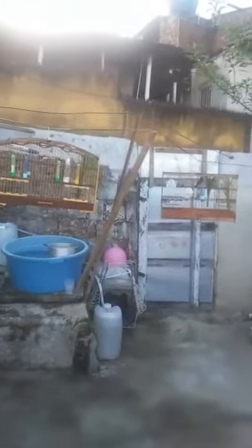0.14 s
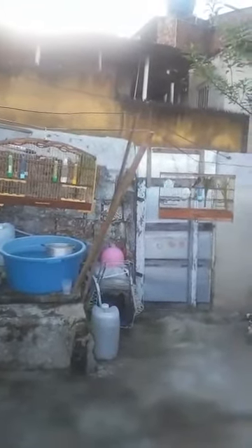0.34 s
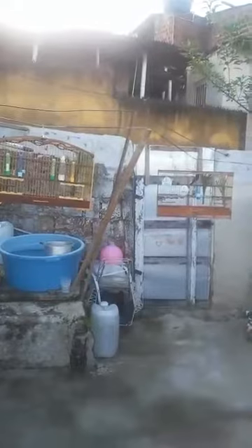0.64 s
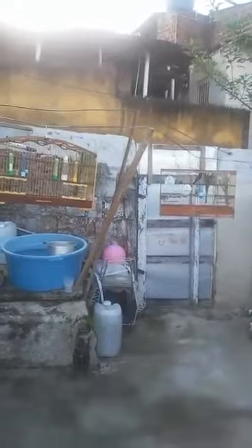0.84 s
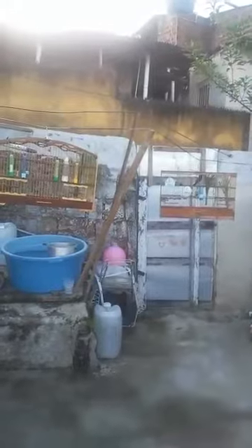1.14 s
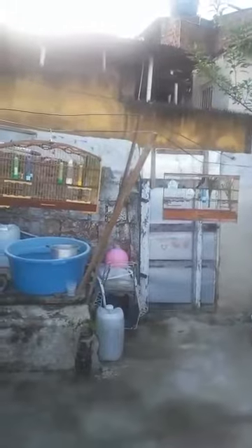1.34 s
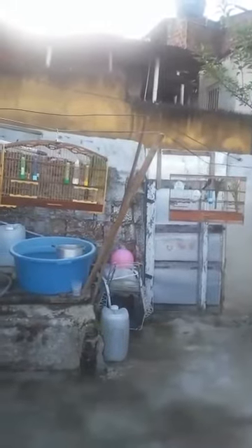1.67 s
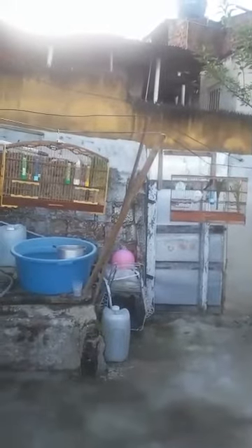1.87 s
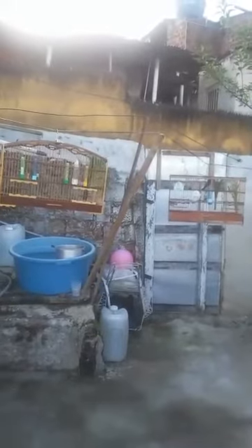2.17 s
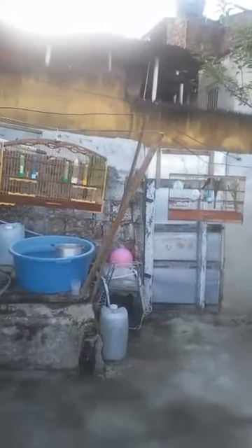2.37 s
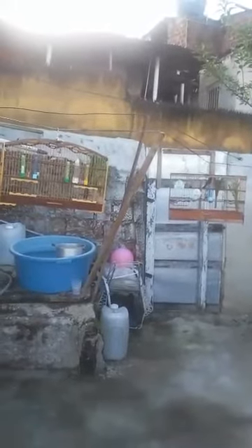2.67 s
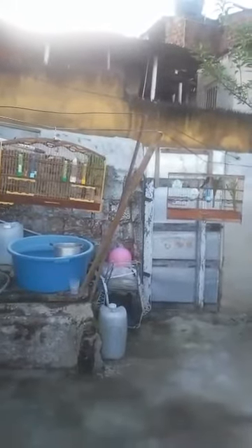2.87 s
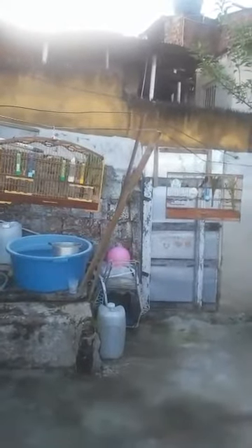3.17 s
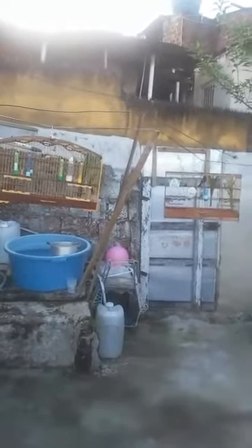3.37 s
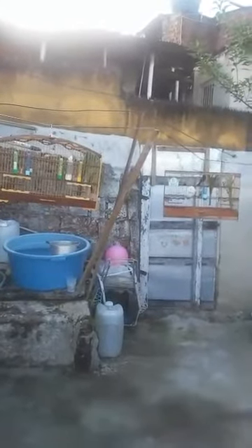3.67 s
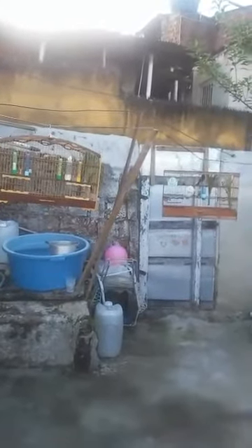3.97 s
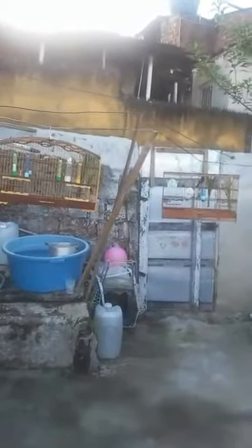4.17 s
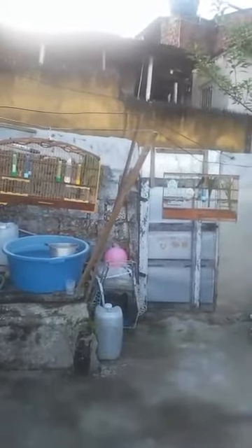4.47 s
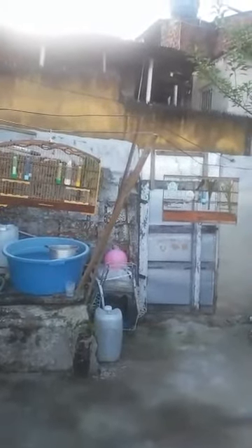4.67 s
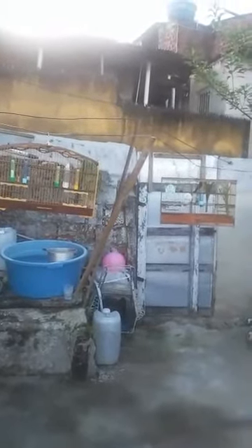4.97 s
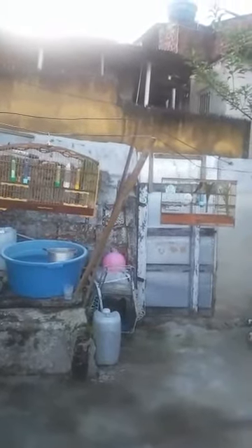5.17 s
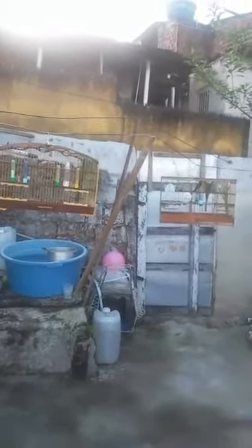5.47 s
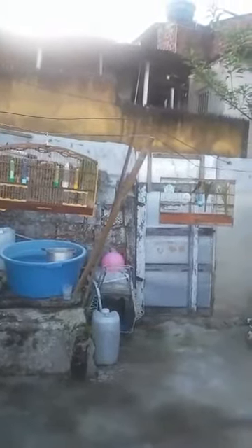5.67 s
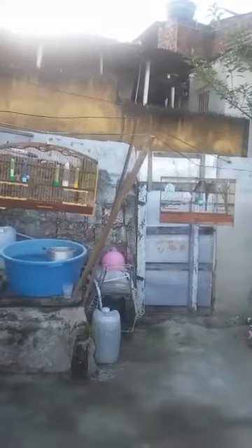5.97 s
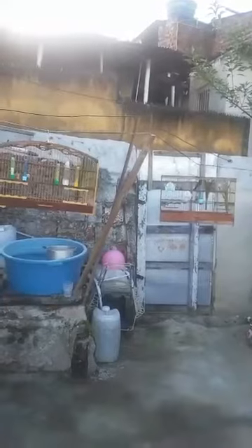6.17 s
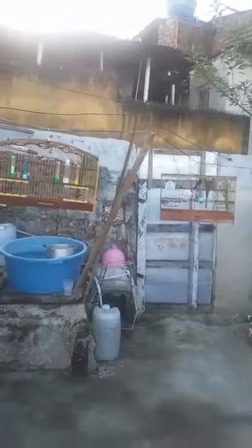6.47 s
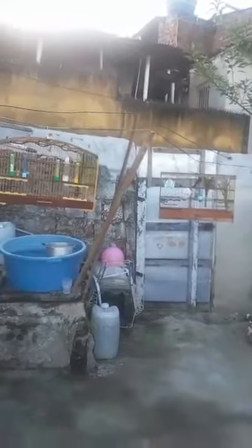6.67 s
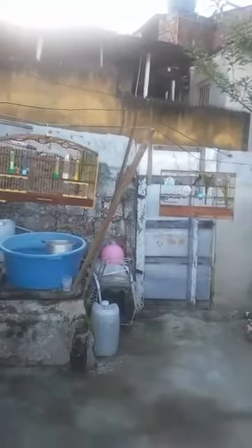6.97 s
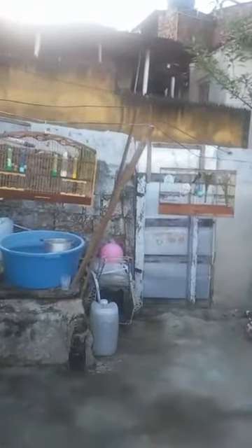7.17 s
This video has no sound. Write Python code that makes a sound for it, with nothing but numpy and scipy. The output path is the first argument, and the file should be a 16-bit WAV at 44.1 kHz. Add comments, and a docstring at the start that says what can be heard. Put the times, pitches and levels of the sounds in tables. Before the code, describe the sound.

A quiet walled backyard, heard from one microphone, with faint traffic, far birds and a low rumble and hum. A broom sweeps softly about twice a second through most of it. Small caged birds chirp and warble lightly from the start, and there is a small tap at 0.6 seconds. From 1.3 to 2.3 seconds a close bird whistles four rising notes, each louder, then one falling note; this is the loudest sound, with a short echo off the walls. A dog barks once in the street at about 2.1 seconds. Around 3.5 to 4 seconds come lighter chirps, a quick twitter and a dull yip. From about 5.1 to 6.9 seconds two roosters crow further off, overlapping, one hoarse, one clear with a long falling last note. The dog barks three more times between 6.4 and 7.3 seconds.

```python
"""Caged seedeater in a walled yard

Close to one phone microphone, a seedeater whistles four rising notes and a falling one, echoed by the
walls; further cages chip and warble. A broom sweeps in even strokes. Out in the street a dog barks and
two roosters crow, one clear, one hoarse, over far birds, traffic, low rumble and mains hum.
The phone's noise suppressor darkens whatever is faint."""
import sys
import numpy as np
from scipy import signal
from scipy.fft import rfft, irfft, next_fast_len
from scipy.io import wavfile
from scipy.ndimage import uniform_filter1d

SR = 44100
rng = np.random.default_rng(int(sys.argv[2]) if len(sys.argv) > 2 else 0)


def persist_wave(psi):
    """Save psi, clipped to +-1, as 16-bit WAV."""
    counts = np.round(np.clip(psi, -1, 1) * 32767).astype(np.int16)
    wavfile.write(sys.argv[1], SR, np.atleast_2d(counts).T)


N = 322799
T = np.arange(N) / SR

# seedeater, close: start t/s, loudest t/s, end t/s, start f/Hz, end f/Hz, peak level/dB,
# end level/dB, octave level/dB
RISING_WHISTLES = [(1.252, 1.424, 1.445, 2330, 3953, -24, -37, -86),
                   (1.512, 1.615, 1.69, 2484, 4789, -19.5, -24.5, -64),
                   (1.719, 1.817, 1.89, 2513, 4838, -16.5, -25, -59.5),
                   (1.923, 2.017, 2.075, 2613, 4750, -13.5, -24, -60.5)]
# their glide (scoop, linger, climb, flat top): share of the length, share of the rise
WHISTLE_GLIDE = [(0, 0), (.05, .1), (.2, .17), (.35, .32), (.6, .68), (.8, .92), (.9, 0.97), (1, 1)]

CAGE_WARBLES = [
    [(.895, 4350, -56), (.92, 4010, -53), (.94, 4020, -48.5)],
    [(.955, 4260, -62), (.975, 3580, -48.5), (1.0, 3507, -46.5), (1.035, 3480, -66)],
    [(3.655, 3060, -46), (3.667, 4150, -42.5), (3.68, 3970, -38.5), (3.692, 3435, -35.5),
     (3.698, 2715, -45)],
    [(3.93, 1833, -70), (3.96, 2030, -51), (4.005, 2250, -52.5), (4.04, 1670, -56)],
]  # further cages, one list a note: t/s, f/Hz, level/dB
CAGE_CHIPS = [(0.308, 2950, -56), (0.642, 3740, -52), (.8, 2900, -53.5), (0.913, 4063, -53),
              (1.178, 4123, -53), (1.443, 3105, -53.5), (3.887, 2900, -53), (4.093, 3900, -53.5),
              (4.226, 2900, -63), (4.365, 3458, -59), (4.615, 3365, -56), (4.868, 3240, -58.5)]  # one bird's chips: t/s, start f/Hz, level/dB
CAGE_TWITTERS = [(0.111, .022, 4780, -57), (.169, 0.038, 5100, -55), (1.112, 0.035, 5140, -56.5),
                 (2.902, 0.0342, 6850, -59.5), (3.643, 0.0044, 3960, -41.5), (3.758, .014, 3040, -47),
                 (3.806, 0.018, 3070, -46.5), (3.85, .018, 3030, -47.5), (3.896, 0.015, 3050, -51.5),
                 (3.916, 0.0097, 3000, -55)]  # thin twitters: t/s, length/s, start f/Hz, level/dB

BROOM_STROKES = [(.22, 0.11, -58.5), (.658, 0.081, -59), (1.13, 0.14, -61.5), (1.558, 0.099, -60),
                 (2.52, 0.13, -60.5), (3.04, .09, -57.5), (3.53, 0.097, -60), (4.08, 0.093, -58),
                 (4.54, 0.108, -65), (4.94, 0.0672, -67.5), (5.35, 0.172, -73.5), (5.751, 0.232, -69),
                 (6.3, 0.1195, -64.5), (6.88, 0.14, -58), (7.279, 0.0836, -65)]  # sweeps in the yard: peak t/s, swell/s, level/dB
BRISTLE_SPECTRUM = [(900, -42.5), (2000, -9), (3200, -4), (4500, 1.5), (6000, -3), (7000, -8),
                    (7600, -20.5), (9300, -22.5), (10500, -50.5)]  # bristle hiss: f/Hz, level/dB
TAP_AND_CLICK = [(0.554, 1420, 0.036, -40.5), (1.611, 7540, 0.00117, -39.5)]  # a small tap, then a digital click: t/s, ring f/Hz, t60/s, peak level/dB

# dog in the street, a high voice breaking into a low one: start t/s, break t/s, end t/s,
# high f/Hz, low f/Hz, high level/dB, low level/dB, high and low tilt/(dB per octave)
DOG_BARKS = [(2.095, 2.195, 2.31, 595, 483.6, -34.5, -35, -2, 12),
             (6.433, 6.502, 6.62, 676.6, 469.4, -36, -31.5, 0, 9),
             (6.8, 6.906, 7.0, 561.3, 441, -36, -35.5, -3.5, 3.5),
             (7.086, 7.154, 7.3, 541.3, 479, -38, -36, -10, -2)]
DOG_YIPS = [(3.712, .16, 569.6, -46.5, -11), (6.692, .08, 583, -39, -14)]  # dull half barks: t/s, length/s, f/Hz, peak level/dB, tilt/(dB per octave)
DOG_FORMANTS = [(550, 390, -19), (941, 226, -2), (1613.5, 160, -8.5), (2400, 230, -33.5)]  # throat resonances: f/Hz, width/Hz, gain/dB
BREATH_SPECTRUM = [(350, -42), (500, -4.5), (1000, 4), (1700, -4.5), (2600, -12.5), (3500, -33.5),
                   (6000, -76)]  # the dog's breath: f/Hz, level/dB

# clear rooster, further off: t/s, length/s, f/Hz, peak level/dB, tilt/(dB per octave)
CROW_SYLLABLES = [(5.353, 0.098, 680, -40, 5), (5.439, 0.089, 700, -44, 0.5), (5.503, .13, 739.6, -51, 1),
                  (5.709, .1, 720, -38, -2), (5.931, 0.17, 718.7, -41, -3), (6.2, .11, 720, -40.5, -0.5)]
CROW_LAST_NOTE = [(6.31, 706, -55.5), (6.419, 670, -46), (6.521, 700, -45.5), (6.7, 692, -44),
                  (6.801, 659.2, -46), (6.869, 627, -44)]  # its long last note: t/s, f/Hz, level/dB
CROW_FORMANTS = [(720, 56, 2), (1420, 250, 6), (2900, 160, -29)]  # its throat: f/Hz, width/Hz, gain/dB
HOARSE_CROW = [(5.11, 601.1, -58), (5.159, 630, -53), (5.302, 575, -48), (5.4, 582.4, -47.5),
               (5.58, 595.2, -55.5), (5.7, 590, -43), (5.8, 586.6, -49), (5.9, 591.7, -42),
               (6.1, 607.7, -44), (6.45, 580.4, -52), (6.601, 567, -69.5)]  # hoarse rooster behind it: t/s, f/Hz, level/dB
HOARSE_FORMANTS = [(620, 340, 1), (1290, 560, 3.5), (1660.4, 270, 3)]  # its throat: f/Hz, width/Hz, gain/dB

# far calls and the roosters' upper overtones: t/s, length/s, f/Hz, spread/Hz, level/dB
BLURRED_TONES = [ (0, 0.35, 1430, 37.7, -59.5), (0.344, 0.34, 1023, 30.3, -61),
                 (.556, 0.1926, 1347, 30.2, -60), (1.406, 0.24, 1229, 39.7, -61),
                 (2.498, .34, 2415, 150, -73), (2.587, 0.1648, 4924, 200.5, -71.5),
                 (3.007, 0.1, 1949, 89.8, -67), (3.002, 0.369, 3795, 433, -68.5),
                 (3.604, 0.33, 1086, 39.4, -57), (3.653, 0.16, 1620, 39.5, -64),
                 (3.902, 0.073, 6470, 160, -67), (4.242, 0.23, 1580, 50.16, -72.5),
                 (4.462, 0.19, 4741, 300, -71.5), (4.5, 0.078, 1890, 60, -64.5),
                 (5.173, 0.334, 4436, 90, -75), (5.3, 0.177, 1635, 120, -51.5),
                 (5.3, .2, 4916, 153.2, -70.5), (5.522, .61, 2684, 122, -63), (5.571, .12, 3130, 250, -68),
                 (5.617, .17, 5400, 151.3, -72.5), (5.886, .1, 3027, 320, -53.5),
                 (5.893, 0.09, 5610, 110, -69.5), (5.893, .38, 2477, 159.4, -60.5),
                 (6.02, .39, 2970, 140.4, -56.5), (6.446, 0.2026, 4421, 486, -61.5),
                 (6.515, 0.16, 5180, 515, -61.5), (6.995, 0.12, 4270, 157.5, -65),
                 (7.2, .12, 5020, 251, -69), (7.225, 0.061, 2816, 79.6, -54.5)]
DISTANT_WHISTLE = [(3.327, 2400, -59.5), (3.462, 3970, -53.5), (3.5, 3916, -55.5), (3.609, 3966, -51)]  # one far rising whistle: t/s, f/Hz, level/dB
CHATTER_BOUTS = [(0.311, 0.74, 2810, -63.5), (1.251, 0.83, 2792, -62.5), (2.15, 0.23, 3231, -66.5),
                 (3.047, 0.983, 3055, -67), (4.345, 0.317, 2754, -70.5), (6.781, 0.42, 3075, -64)]  # far birds: t/s, length/s, centre f/Hz, level/dB
TRAFFIC_SPECTRUM = [(200, -39.5), (350, -9.5), (480, -0.5), (900, 0.5), (1220, -3), (1400, -10),
                    (2200, -20), (3500, -27.5), (6000, -35.5), (9000, -50)]  # wash from beyond the walls: f/Hz, level/dB
TRAFFIC_LEVELS = [(0, -54.5), (.7, -59), (2, -60.5), (2.7, -58.5), (3.4, -61), (4.5, -56), (4.8, -64),
                  (5.1, -60.5), (6.3, -59.5), (6.6, -56.5), (7.32, -53.5)]  # its slow swell: t/s, level/dB
RUMBLE_SPECTRUM = [(60, -41.5), (110, -25.5), (160, -23.5), (210, -3.5), (270, -1), (380, 1.5), (480, -28)]  # low rumble: f/Hz, level/dB
RUMBLE_HUM_LEVELS = [(0, -69.5, -85), (1.3, -68.5, -80), (3.5, -68.5, -84.5), (5.0, -76, -86.5),
                     (6.3, -78, -90), (7.32, -90, -87.5)]  # rumble and hum: t/s, rumble level/dB, mains level/dB
MAINS_LINES = [(120, -5), (360, 8.5)]  # hum partials: f/Hz, gain/dB

WALL_ECHOES = [(3, -5), (6, -15.5), (10, -8.5), (15, -8.5)]  # nearest walls: delay/ms, level/dB
# diffuse tails at the microphone: t60/s, level/dB against the direct sound
YARD_TAILS = [(.15, 0.5), (0.501, -15.5)]  # quick flutter, then a long tail
PORCH_TAILS = [(0.351, -1.8)]  # further cages, mostly direct
STREET_TAILS = [(0.201, -3), (0.901, -2)]  # more tail than direct sound
ROOF_TAILS = [(.5, -8)]  # in the open, little echo


def seedeater(swell_db_per_s=260, octave_change_db=9, sink_s=.058):
    """Close to the microphone: near-sine whistles with a faint, breathy octave."""
    out, progress, notes = np.zeros(N), np.linspace(0, 1, 25), []
    glide = np.interp(progress, *np.transpose(WHISTLE_GLIDE))
    for start, loudest, end, start_hz, end_hz, peak_db, end_db, octave_db in RISING_WHISTLES:
        t = start + progress * (end - start)
        hz = start_hz + (end_hz - start_hz) * glide
        onset_db = peak_db - swell_db_per_s * (loudest - start)
        db = np.interp(t, [start, loudest, end], [onset_db, peak_db, end_db])
        notes.append((t, hz, db, octave_db - octave_change_db * progress))
    # the closing whistle sinks towards a floor while its octave grows
    start, full, end, start_hz, floor_hz = 2.118, 2.178, 2.278, 8870, 5618
    t = start + progress * (end - start)
    hz = floor_hz + (start_hz - floor_hz) * np.exp(-(t - start) / sink_s)
    db = np.interp(t, [start, full, end - .019, end], [-62.5, -23, -23, -33.5])
    notes.append((t, hz, db, -76.5 + octave_change_db * progress))
    for t, hz, db, octave_db in notes:
        sing(out, np.transpose([t, hz, db]), pure, rough=.2, rasp_hz=250, edge_s=.006)
        sing(out, np.transpose([t, 2 * hz, octave_db]), pure, rough=1, rasp_hz=1500, edge_s=.0062)
    return out


def cage_birds(chip_s=.026, chip_end_hz=2400, twitter_drop_per_s=5.3):
    """Further cages on the porch: warbles, and chips and twitters that drop fast, then level out."""
    out = np.zeros(N)
    for note in CAGE_WARBLES:
        sing(out, note, pure, rough=.13)
    drops = [(t, chip_s, hz, chip_end_hz, db) for t, hz, db in CAGE_CHIPS]
    for t, length, hz, db in CAGE_TWITTERS:
        drops.append((t, length, hz, hz * (1 - twitter_drop_per_s * length), db))
    for t, length, start_hz, end_hz, db in drops:
        mid_hz = end_hz + .26 * (start_hz - end_hz)
        note = [(t, start_hz, db), (t + length / 2, mid_hz, db), (t + length, end_hz, db)]
        sing(out, note, pure, rough=.35, rasp_hz=700, edge_s=.00067)
    return out


def broom(fall_ratio=1.07):
    """Across the yard: scratchy bristle hiss, each stroke swelling smoothly and trailing away."""
    strokes = 0
    for peak, swell_s, db in BROOM_STROKES:
        rise = np.exp(-((T - peak) / swell_s) ** 2)
        fall = 1 / np.cosh(np.clip((T - peak) / (fall_ratio * swell_s), 0, 50)) ** 2
        strokes += undb(db) * np.where(T < peak, rise, fall)
    scratches = undb(2 * wander(120))
    return strokes * scratches * coloured_noise(BRISTLE_SPECTRUM)


def tap_and_click():
    """A small tap and a thin, dry digital click, each a damped sine."""
    out, t = np.zeros(N), np.arange(2000) / SR
    for start, hz, t60, db in TAP_AND_CLICK:
        i = int(start * SR)
        out[i:i + len(t)] += undb(db - 60 * t / t60) * np.sin(2 * np.pi * hz * t)
    return out


def dog(attack_s=.0461, break_s=.008, release_s=.0481, breath_db=-6.5):
    """In the street: rough voiced barks and yips; breath noise follows their level and brightness."""
    voice, breath, effort, calls = np.zeros(N), coloured_noise(BREATH_SPECTRUM), 0, []
    for start, turn, end, high_hz, low_hz, high_db, low_db, high_tilt, low_tilt in DOG_BARKS:
        calls.append([(start, .92 * high_hz, high_db - 12.5, -20),  # scoops up into the high, dull voice
                      (start + attack_s, high_hz, high_db, high_tilt),
                      (turn, high_hz, high_db, high_tilt),
                      (turn + break_s, 1.07 * low_hz, low_db, low_tilt),  # breaks lower and brighter
                      (end - release_s, low_hz, low_db, low_tilt),
                      (end, low_hz, low_db - 12, low_tilt)])
    for t, length, hz, db, tilt in DOG_YIPS:
        calls.append([(t, hz, db - 12.5, tilt),
                      (t + length / 3, hz, db, tilt),
                      (t + length, .9 * hz, db - 17.5, tilt)])
    for call in calls:
        sing(voice, call, throat(DOG_FORMANTS), rough=.45, rasp_hz=240)
        t, _, db, tilt = np.transpose(call)
        effort += undb(np.interp(T, t, db + np.minimum(tilt, 0) / 2, left=-200, right=-200))
    breath *= undb(breath_db) * uniform_filter1d(effort, size=300)
    return low_cut(voice + breath, hz=431)


def clear_rooster(edge_pitch_ratio=.97, last_tilt_db=18.5):
    """Further off, in the open: short arched syllables, then a long, bright, falling note."""
    out, notes = np.zeros(N), []
    for t, length, hz, db, tilt in CROW_SYLLABLES:
        notes.append([(t, edge_pitch_ratio * hz, db - 2.5, tilt),
                      (t + .4 * length, hz, db, tilt),
                      (t + length, edge_pitch_ratio * hz, db - 6, tilt)])
    notes.append([(*row, last_tilt_db) for row in CROW_LAST_NOTE])
    for note in notes:
        sing(out, note, throat(CROW_FORMANTS), rough=.17, rasp_hz=70, edge_s=.0027)
    return out


def hoarse_rooster(waver_share=.012):
    """Behind the clear one: a rasping crow whose pitch wavers."""
    out = np.zeros(N)
    times, hz, db = np.transpose(HOARSE_CROW)
    t = np.arange(times[0], times[-1], .01)
    waver = 1 + waver_share * wander(9)[(t * SR).astype(int)]
    note = np.transpose([t, waver * np.interp(t, times, hz), np.interp(t, times, db)])
    sing(out, note, throat(HOARSE_FORMANTS), rough=.8, rasp_hz=450)
    return low_cut(out, hz=523)


def blurred_tones(sag_ratio=.97):
    """Faint blurred tones: far calls, the roosters' upper overtones and one rising whistle."""
    out = np.zeros(N)
    for t, length, hz, spread_hz, db in BLURRED_TONES:
        note = [(t, hz, db), (t + length, sag_ratio * hz, db)]
        sing(out, note, pure, rough=spread_hz / 50, rasp_hz=2 * spread_hz, edge_s=.024)
    sing(out, DISTANT_WHISTLE, pure, rough=.98, rasp_hz=1000, edge_s=.017)
    return out


def traffic():
    """Beyond the walls: a wash of noise that slowly swells and ebbs."""
    level_db = np.interp(T, *np.transpose(TRAFFIC_LEVELS))
    return coloured_noise(TRAFFIC_SPECTRUM) * undb(level_db + .8 * wander(6))


def distant_chatter():
    """Birds so far off that each bout blurs into a band of noise."""
    out = np.zeros(N)
    for t, length, hz, db in CHATTER_BOUTS:
        sing(out, [(t, hz, db), (t + length, hz, db)], pure, rough=.955, rasp_hz=1400, edge_s=.049)
    return out


def rumble():
    """Low rumble; its set fade stands for the phone's noise suppressor gradually turning it down."""
    t, db, _ = np.transpose(RUMBLE_HUM_LEVELS)
    return coloured_noise(RUMBLE_SPECTRUM) * undb(np.interp(T, t, db))


def mains_hum():
    """Under everything: mains lines that waver a little in level."""
    t, _, level_db = np.transpose(RUMBLE_HUM_LEVELS)
    lines = sum(undb(db + 2.4 * wander(22)) * np.sin(2 * np.pi * hz * T) for hz, db in MAINS_LINES)
    return np.sqrt(2) * lines * undb(np.interp(T, t, level_db))


def sing(out, rows, overtones, rough, rasp_hz=60, edge_s=.004):
    """Adds a note of rows (t/s, f/Hz, level/dB, optional tilt); rough trades tone for rasp."""
    times, hz, db, *tilt = np.transpose(rows)
    i = np.arange(max(int(times[0] * SR), 0), min(int(times[-1] * SR), N))
    t = i / SR
    pitch = uniform_filter1d(np.interp(t, times, hz), int(.003 * SR), mode="nearest")
    phase = 2 * np.pi * np.cumsum(pitch) / SR
    tilt_db = np.interp(t, times, tilt[0]) if tilt else 0
    rasp_share, note, power = np.clip(rough, 0, 1), 0, 0
    for k in range(1, 8):
        gain = overtones(k, k * pitch) * undb(tilt_db * np.log2(k))
        if k * pitch.max() < .45 * SR and np.max(gain) > 0:
            rasp = (wander(rasp_hz, len(i)) + 1j * wander(rasp_hz, len(i))) / np.sqrt(2)
            flutter = np.sqrt(1 - rasp_share) + np.sqrt(rasp_share) * rasp
            note += gain * np.real(flutter * np.exp(1j * k * phase))
            power += gain ** 2 / 2
    fade = np.clip(np.minimum(t - times[0], times[-1] - t) / edge_s, 0, 1)
    out[i] += note / np.sqrt(power) * undb(np.interp(t, times, db)) * fade


def throat(formants):
    """Gain of partial k at frequency f through steep throat resonances."""
    return lambda k, f: sum(undb(db) / (1 + ((f - hz) / width) ** 2) ** 2 for hz, width, db in formants)


def pure(k, f):
    """A whistle's partials: the fundamental alone."""
    return float(k == 1)


def space(x, tails, echoes=()):
    """The way to the microphone: direct sound, diffuse tails and single wall echoes."""
    t = np.arange(int(1.2 * SR)) / SR
    response = np.zeros(len(t))
    for t60, db in tails:
        tail = rng.standard_normal(len(t)) * undb(-60 * t / t60) * np.clip(t / .0063, 0, 1)
        response += tail * undb(db) / np.sqrt(np.sum(tail ** 2))
    response[0] = 1
    for ms, db in echoes:
        response[int(ms * SR / 1000)] += undb(db)
    return signal.fftconvolve(x, response)[:N] / np.sqrt(np.sum(response ** 2))


def patchy(x, depth_db, bands=5, frames=8):
    """Patchy noise: narrow bands swell and fade at random; the bass stays steadier."""
    spectrum = signal.stft(x, nperseg=1024, boundary="even")[2]
    patches = rng.standard_normal(spectrum.shape)
    for _ in range(2):
        patches = uniform_filter1d(uniform_filter1d(patches, bands, axis=0), frames, axis=1)
    depth_share = np.clip(np.linspace(0, SR / 2, len(spectrum)) / 2500, .3, 1)[:, None]
    gain = undb(depth_db * depth_share * unit(patches))
    gain /= np.sqrt(np.mean(gain ** 2, axis=1, keepdims=True))
    return signal.istft(spectrum * gain, nperseg=1024)[1][:N]


def coloured_noise(points):
    """Noise of rms 1 with a spectrum of (f/Hz, level/dB) points."""
    hz, db = np.transpose(points)
    size = 2 * next_fast_len(N // 2 + 1)
    f = np.linspace(1, SR / 2, size // 2 + 1)
    gain = undb(np.interp(np.log(f), np.log(hz), db))
    return unit(irfft(rfft(rng.standard_normal(size)) * gain)[:N])


def wander(rate, size=N):
    """Smooth random drift of rms 1, about rate changes a second."""
    drift = rng.standard_normal(size)
    for _ in range(3):
        drift = uniform_filter1d(drift, max(int(SR / rate), 2))
    return unit(drift)


def low_cut(x, hz):
    return signal.sosfilt(signal.butter(6, hz, "high", fs=SR, output="sos"), x)


def undb(db):
    return 10 ** (np.asarray(db) / 20)


def unit(x):
    return x / np.sqrt(np.mean(x ** 2))


def scene():
    """Yard, porch, street and roof as they reach one microphone in the yard."""
    yard = space(seedeater(), YARD_TAILS, WALL_ECHOES)
    porch = space(cage_birds(), PORCH_TAILS)
    street = space(dog() + hoarse_rooster() + blurred_tones(), STREET_TAILS)
    roof = space(clear_rooster(), ROOF_TAILS)
    wash = patchy(broom() + traffic() + distant_chatter() + rumble(), depth_db=3.5)
    return (yard + porch + street + roof + tap_and_click() + wash + mains_hum())[None]


def record(dry):
    """The phone: a suppressor turns down faint narrow bands; converter hiss; a steep treble cut."""
    threshold_db, floor_db, hiss_db, top_hz = -85.5, -10.5, -94, 13000
    spectrum = signal.stft(dry[0], nperseg=1024, boundary="even")[2]
    power = uniform_filter1d(uniform_filter1d(abs(spectrum) ** 2, 3, axis=0), 6, axis=1)
    gain = np.maximum(power ** 2 / (power ** 2 + undb(4 * threshold_db)), undb(floor_db))
    suppressed = signal.istft(spectrum * gain, nperseg=1024)[1][:N]
    hiss = undb(hiss_db) * rng.standard_normal(N)
    treble_cut = signal.ellip(8, .2, 60, top_hz, fs=SR, output="sos")
    return signal.sosfilt(treble_cut, suppressed + hiss)[None]


dry = scene()
out = record(dry)
persist_wave(out)
```